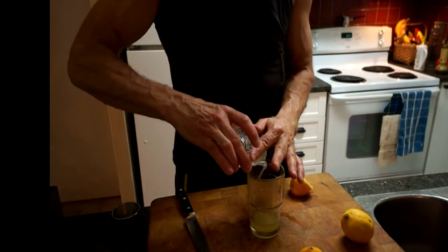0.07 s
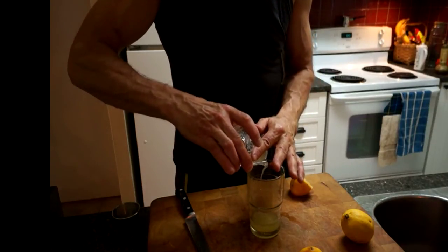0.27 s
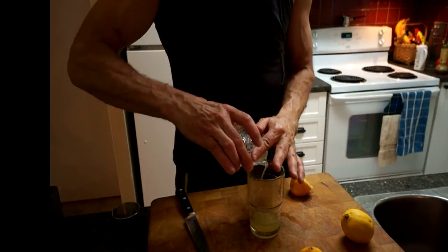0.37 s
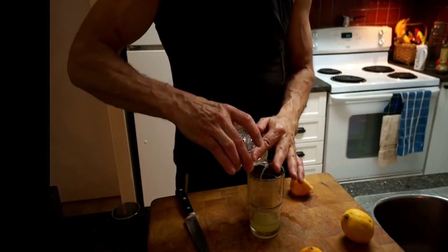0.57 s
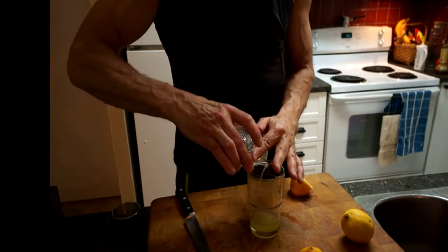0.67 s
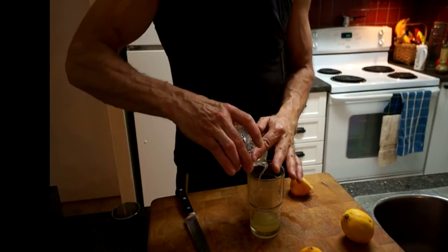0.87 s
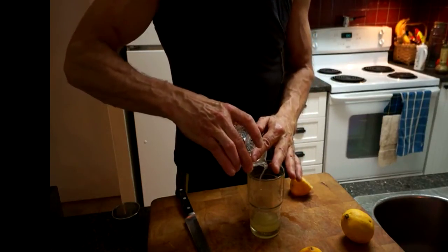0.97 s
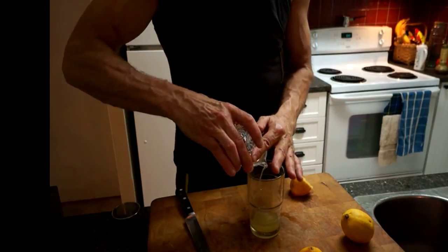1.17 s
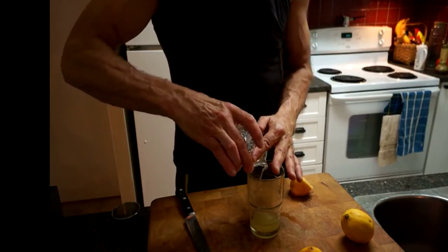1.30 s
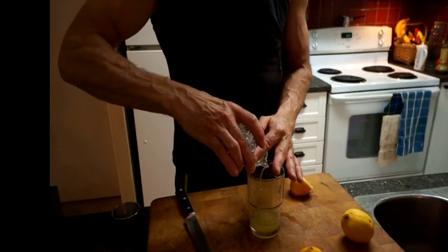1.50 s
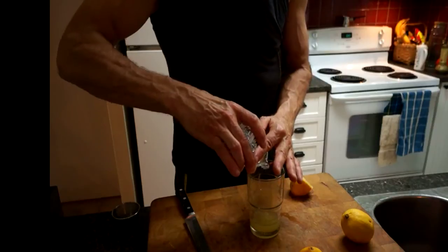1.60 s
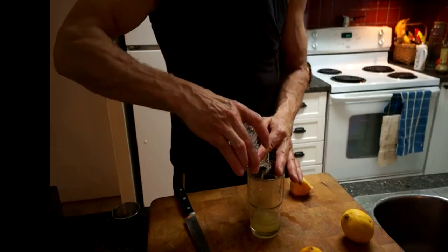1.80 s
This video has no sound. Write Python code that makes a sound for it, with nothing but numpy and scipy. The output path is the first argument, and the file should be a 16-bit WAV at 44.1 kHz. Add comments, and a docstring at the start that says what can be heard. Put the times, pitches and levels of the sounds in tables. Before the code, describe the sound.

Juice squelches out of a hand-squeezed citrus half and plops into a glass.

```python
"""In a small, quiet kitchen, a citrus half is squeezed by hand over a glass.
Juice plops into the glass and rings its air column; air squelches through the pulp in rising chirps,
and juice sacs burst in ticks. A fine wet crackle, a trickle and tiny pops swell with each press.
The room answers; a dull rumble swells once and an appliance hums softly."""
import sys
import numpy as np
from scipy import signal
from scipy.fft import rfft, irfft, next_fast_len
from scipy.io import wavfile

SR = 44100
rng = np.random.default_rng(int(sys.argv[2]) if len(sys.argv) > 2 else 0)


def store_pcm(level_fs):
    """Save levels as 16-bit WAV."""
    pcm = np.round(np.clip(level_fs, -1, 1) * 32767).astype(np.int16)
    wavfile.write(sys.argv[1], SR, np.atleast_2d(pcm).T)


N = 81585
T = np.arange(N) / SR
FFT_SIZE = next_fast_len(N + SR)
FREQS = np.fft.rfftfreq(FFT_SIZE, 1 / SR)


def plops():
    """Juice falls into the glass in round, bubbling plops."""
    # Each row: start in seconds, pitch in Hz, level in dB, relative rise per second, swell in seconds.
    drops = [(.2025, 733, -29, 0, 0.0047), (.217, 776, -28, -9.5, 0.0059), (.238, 753, -39.5, -2, 0.0077),
             (.281, 687, -28, 9, 0.006), (.2935, 685.5, -20, 13.5, 0.0046),
             (.308, 756.7, -17.5, 11, 0.0028), (.304, 1080, -33, 9.5, 0.0058),
             (.331, 743, -22, 9.5, 0.0046), (.339, 1070, -24.5, 22.5, 0.00452),
             (.428, 804, -27.5, 64, 0.0027), (.5035, 886, -28, 4, 0.0041),
             (.531, 727.7, -29.5, 15.5, 0.0036), (.5605, 744, -31.5, 19, 0.0033),
             (.586, 985, -33.5, 37, 0.00297), (.6035, 749, -32.5, 4, 0.0079), (.647, 787, -20, 35, 0.0026),
             (.6535, 1260, -28, 5.5, 0.0034), (.659, 753.2, -33.5, 10, 0.0069),
             (.714, 1210, -34.5, 4, 0.0027), (.794, 795, -36, 11, 0.0066), (.819, 746, -28.5, 13, 0.0049),
             (.989, 807.7, -27.5, 23, 0.0045), (1.063, 810, -21, 22, 0.0038),
             (1.074, 1206, -28.5, 27, 0.00169), (1.158, 754, -31, 65, 0.00335),
             (1.1992, 857, -21.5, -4, 0.0022), (1.244, 755, -31, 7.5, 0.0092),
             (1.246, 1075, -28, 13, 0.003), (1.3548, 780, -19, 29, 0.003), (1.3595, 1127, -26, 5, 0.003),
             (1.368, 788.6, -23, 2, 0.0037), (1.5305, 918, -35.5, 0, 0.00416)]
    return bubbles(drops)


def squelches():
    """Air forced through the pulp chirps with a rougher, faster flutter."""
    # Each row: start in seconds, pitch in Hz, level in dB, relative rise per second, swell in seconds.
    pockets = [(.1905, 3930, -32, 11, 0.0032), (.292, 2165, -33.5, 39, 0.0064),
               (.334, 1896, -38, 28.5, 0.0055), (.361, 2032, -39, 13.5, 0.0072),
               (.4045, 1386, -24.5, 82.5, 0.0045), (.4115, 2497, -29, 22, 0.0072),
               (.416, 1853, -34, 8, 0.00715), (.563, 1657, -41.5, 80, 0.00413),
               (.694, 1607, -36, 28.5, 0.0018), (.849, 963, -38.5, 80, 0.0063),
               (.883, 3856, -28.5, 12.5, 0.0037), (.882, 2006, -31, 18.5, 0.0028),
               (.908, 1760, -32.5, 49, 0.00235), (.921, 1824, -39, 16, 0.0082),
               (.9585, 4093, -24.5, 13, 0.0024), (.961, 3380, -34.5, -3, 0.0027),
               (1.063, 2330, -32, 33, 0.00177), (1.1187, 2220, -24.5, 12, 0.0016),
               (1.119, 1637, -26.5, 8, 0.0029), (1.27, 2180, -38, -2, 0.0054),
               (1.3185, 3710, -32, 35, 0.0022), (1.4415, 2290, -28.5, 58, 0.0068),
               (1.445, 2784, -27.5, -1.5, 0.0038), (1.5765, 946, -25, 114, 0.0035),
               (1.582, 1740, -33.5, 1, 0.004), (1.6725, 3980, -39.5, 13.5, 0.0022)]
    return bubbles(pockets, rough=0.693, flutter_hz=700)


def bubbles(rows, rough=0.34, flutter_hz=405):
    """Bubbles are short tones that flutter with their unsteady walls; most climb as they surface."""
    out, t = np.zeros(N), T[:SR // 16]
    flutter_band = np.exp(-(np.fft.fftfreq(len(t), 1 / SR) / flutter_hz) ** 2)
    for start, hz, db, rise, peak_s in rows:
        flutter = np.fft.ifft(flutter_band * np.exp(2j * np.pi * rng.random(len(t))))
        chirp = np.exp(2j * np.pi * hz * (t + rise * t * t / 2))
        tone = (1 + rough * flutter / flutter.std()) * chirp
        add(out, start, amp(db) * swell(t, peak_s) * tone.imag / np.hypot(1, rough))
    return out


def ticks():
    """Each bursting juice sac is a tiny spray of noise around its own pitch."""
    # Each row: start in seconds, centre in Hz, level in dB, half width in octaves.
    sacs = [(0.191, 6100, -40.5, 0.53), (0.273, 7360, -41, 0.253), (0.33, 6460, -37.5, 0.11),
            (0.335, 6700, -39, 1), (0.371, 8950, -44, 0.61), (0.404, 9830, -36, 0.18),
            (0.429, 9780, -44.5, 0.34), (.462, 4100, -41.5, 1), (0.581, 5570, -35, 1),
            (0.615, 7300, -38, 0.035), (0.611, 6840, -39, 1), (.647, 4500, -34.5, 0.43),
            (0.646, 8100, -36.5, 0.71), (0.709, 6500, -47, 0.72), (0.847, 5800, -41, 0.94),
            (0.904, 8960, -45.5, .4), (0.908, 4190, -40, 0.35), (0.938, 6390, -43, .15),
            (0.958, 8260, -30, 0.69), (1.0395, 7760, -36, 0.4), (1.062, 3000, -35.5, 0.36),
            (1.12, 3460, -40.5, 0.21), (1.159, 7000, -45.5, 0.36), (1.269, 9800, -32.5, 0.23),
            (1.319, 4960, -41, 1), (1.354, 2340, -43.5, .6), (1.4378, 8740, -28.5, 0.15),
            (1.516, 7900, -40, 1.0), (1.573, 5850, -47.5, 0.7)]
    out, t = np.zeros(N), T[:SR // 40]
    hz = np.fft.rfftfreq(len(t), 1 / SR) + 1
    envelope = swell(t, peak_s=0.0033)
    for start, centre, db, octaves in sacs:
        band = 1 / (1 + (np.log2(hz / centre) / octaves) ** 2)
        spray = envelope * irfft(rfft(rng.standard_normal(len(t))) * band, len(t))
        add(out, start, amp(db) * spray * np.linalg.norm(envelope) / np.linalg.norm(spray))
    return out


def crackle():
    """Seeping juice crackles in bright, uneven grains."""
    # Each row: frequency in Hz, relative level in dB.
    colour = [(300, -53), (1350, -17), (1650, 3.5), (2200, 6.5), (2650, -33), (3000, -2.5), (4100, -4.5),
              (5500, -34), (10500, -18)]
    return amp(-4) * seep(colour, per_s=420, spread_db=8)


def trickle():
    """Fine, even drops land in the juice."""
    # Each row: frequency in Hz, relative level in dB.
    colour = [(300, -58.5), (620, -5.5), (760, 6), (1000, 1.5), (1230, 1.5), (1450, -26.5), (3000, -20.5)]
    return seep(colour, per_s=550, spread_db=1)


def seep(colour, per_s, spread_db):
    """Countless tiny wet grains swell with each press of the hand."""
    sizes = amp(spread_db * np.clip(rng.standard_normal(N), -2, 2)) * rng.choice([-1, 1], N)
    grains = sizes * (rng.random(N) < per_s / SR)
    # A minimum-phase filter keeps each grain's attack sharp.
    cepstrum = irfft(np.log(amp(along(colour))), FFT_SIZE)
    cepstrum[1:FFT_SIZE // 2] *= 2
    cepstrum[FFT_SIZE // 2:] = 0
    return unit(filtered(grains, np.exp(rfft(cepstrum)))) * pressure(T)


def pops(per_s, middle_hz, trim_db):
    """Tiny rising bubbles break under each press."""
    spread_octaves, spread_db, rise_per_s, swell_s = 0.56, 7.5, 33, 0.0017
    when, pitch, size = rng.random((int(per_s * T[-1]), 3)).T
    starts = when * T[-1]
    hz = middle_hz * 2 ** (spread_octaves * (2 * pitch - 1))
    db = trim_db + spread_db * (2 * size - 1) + 20 * np.log10(pressure(starts) + 1e-9)
    return bubbles([(*row, rise_per_s, swell_s) for row in zip(starts, hz, db)])


def pressure(t):
    """How hard the hand presses at time t, as a gain."""
    # Each row: hardest moment in seconds, half length in seconds, level in dB.
    presses = [(0.392, 0.1, -42.5), (0.635, 0.082, -44.5), (0.849, 0.19, -54), (1.189, 0.12, -45.5),
               (1.553, 0.16, -52.5)]
    return sum(amp(db) * np.exp(-((t - s) / half_s) ** 2) for s, half_s, db in presses)


def glass(x, low_cut_hz=651.2):
    """The glass and its air column ring with the juice; the small mouth lets out little bass."""
    # Each row: resonance in Hz, width in Hz, gain in dB.
    modes = [(744.6, 58.6, 4), (961.9, 38, -8), (1160, 93, -5), (1230, 41, 0.5), (1763, 41, -1.5),
             (2038, 52, 4.5), (2337, 73, 9.5), (2832, 43, 0.5), (3960, 33, 5), (4760, 120, 6),
             (5930, 81, 4)]
    f = FREQS
    ring = 1 + sum(amp(db) * 1j * f * w / (hz * hz - f * f + 1j * f * w) for hz, w, db in modes)
    mouth = 1 - 1 / (1 + (f / low_cut_hz) ** 10)
    return filtered(x, ring * mouth)


def kitchen(x, positions=8):
    """Near scatter off the board and hands, and a short room tail, both changing as the hands move."""
    # Each row: frequency in Hz, seconds to die away by 60 dB.
    decay = [(300, 0.56), (900, 0.27), (2200, 0.5), (4200, 0.39), (10000, 0.24)]
    # Each row: frequency in Hz, tail level in dB.
    colour = [(300, 1.5), (800, -0.5), (2200, -3), (4000, 0), (7000, -3.5), (10500, -3)]
    delay_s, near_db, near_t60_s = 0.005, -9.5, 0.016
    out = np.zeros((2, N))
    for k in range(positions):
        hz, t, noise = signal.stft(rng.standard_normal((2, SR // 2)), SR, nperseg=256)
        fade = amp(-60 * t / along(decay, hz)[:, None])
        energy = np.mean(fade ** 2, axis=1, keepdims=True) * SR / 2
        fade *= amp(along(colour, hz))[:, None] / np.sqrt(energy)
        tail = pair(signal.istft(noise * fade, SR, nperseg=256)[1], alike=0.75)
        near = rng.standard_normal(tail.shape[1]) * amp(-60 * T[:tail.shape[1]] / near_t60_s)
        echoes = tail + amp(near_db) * near / np.linalg.norm(near)
        crossfade = np.maximum(0, 1 - abs(T / T[-1] * (positions - 1) - k))
        add(out, delay_s, signal.fftconvolve((x * crossfade)[None], echoes, axes=1))
    return out


def rumble(peak_s=1.3055, half_s=0.15, hz=166.6, half_width_hz=15):
    """A dull, narrow band of noise swells briefly late in the squeeze."""
    body = filtered(rng.standard_normal(N), 1 / (1 + ((FREQS - hz) / half_width_hz) ** 2))
    return amp(-51) * unit(body) * np.exp(-((T - peak_s) / half_s) ** 2)


def room_tone():
    """A soft, dark bed of room noise."""
    # Each row: frequency in Hz, relative level in dB.
    colour = [(25, -4), (130, 1), (240, 0.5), (330, -6), (600, -5), (1100, -11.5), (2200, -14),
              (3200, -15.5), (5500, -24), (10500, -25.5)]
    # Each row: frequency in Hz, left-right likeness from 0 to 1.
    likeness = [(40, 0.96), (130, 0.98), (280, 0.89), (1000, 0.61), (9000, 0.84)]
    air = pair(rfft(rng.standard_normal((2, FFT_SIZE))), along(likeness)) * amp(along(colour))
    return amp(-47) * unit(irfft(air, FFT_SIZE)[:, :N])


def appliance():
    """An appliance hums on two faint, steady tones."""
    # Each row: pitch in Hz, rms level in dB.
    tones = [(166, -66), (409.5, -60.5)]
    return sum(amp(db) * np.sqrt(2) * np.sin(2 * np.pi * (hz * T + rng.random())) for hz, db in tones)


def swell(t, peak_s):
    """A soft rise to 1 at peak_s, cut short as the bubble bursts."""
    u = t / peak_s
    return (u * u * np.exp(1 - u * u)) ** (3 / 4)


def amp(db):
    """Decibels to gain."""
    return 10 ** (np.asarray(db) / 20)


def unit(x):
    """Scale to rms 1."""
    return x / np.sqrt(np.mean(x ** 2) + 1e-20)


def along(points, hz=FREQS):
    """Join (Hz, value) points into a curve on a log frequency axis."""
    freqs, values = np.transpose(points)
    return np.interp(np.log(hz + 1), np.log(freqs + 1), values)


def filtered(x, response):
    """Shape a sound with a frequency response."""
    return irfft(rfft(x, FFT_SIZE) * response, FFT_SIZE)[..., :N]


def add(track, start_s, sound):
    """Mix a sound into the track at start_s."""
    part = track[..., max(0, round(start_s * SR)):][..., :sound.shape[-1]]
    part += sound[..., :part.shape[-1]]


def pair(two, alike):
    """Spread two unrelated signals to left and right with the given likeness."""
    turn = np.arccos(np.clip(alike, 0, 1)) / 2
    mid, side = two[0] * np.cos(turn), two[1] * np.sin(turn)
    return np.array([mid + side, mid - side])


def scene():
    """The juice rings the glass, slightly left of centre, over the kitchen's quiet bed."""
    # Each row: frequency in Hz, left over right in dB.
    balance = [(750, 1.5), (2000, 2), (4000, 1.06)]
    juice = crackle() + trickle() + plops() + squelches()
    splatter = pops(per_s=260, middle_hz=1790, trim_db=-4)  # in the pulp
    fizz = pops(per_s=200, middle_hz=7030, trim_db=-14)  # on the wet peel
    juice = glass(juice + splatter + fizz + ticks())
    pan = amp(along(balance) * [[.5], [-.5]])
    return filtered(juice + kitchen(juice), pan) + rumble() + room_tone() + appliance()


def record(dry, top_hz=11020):
    """A steep low-pass takes off the highest treble."""
    return filtered(dry, 1 / np.sqrt(1 + (FREQS / top_hz) ** 240))


dry = scene()
out = record(dry)
store_pcm(out)
```